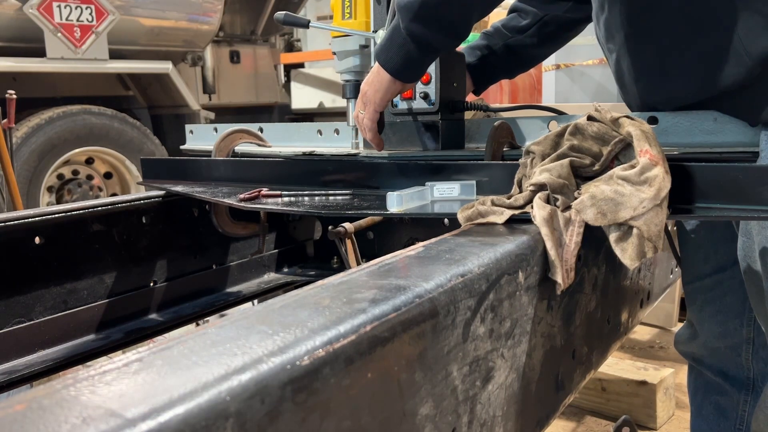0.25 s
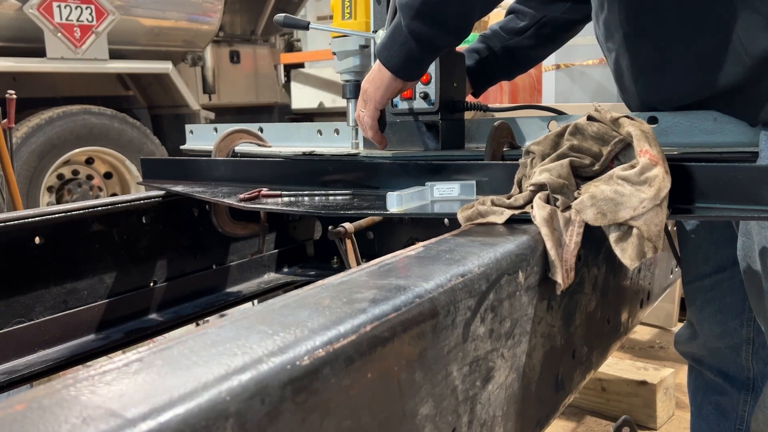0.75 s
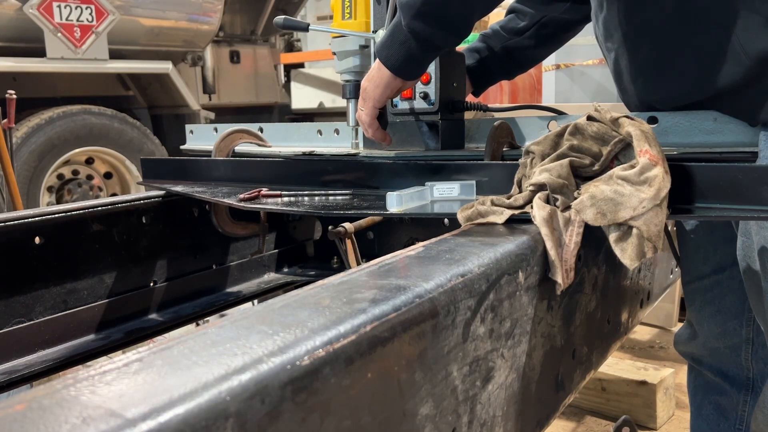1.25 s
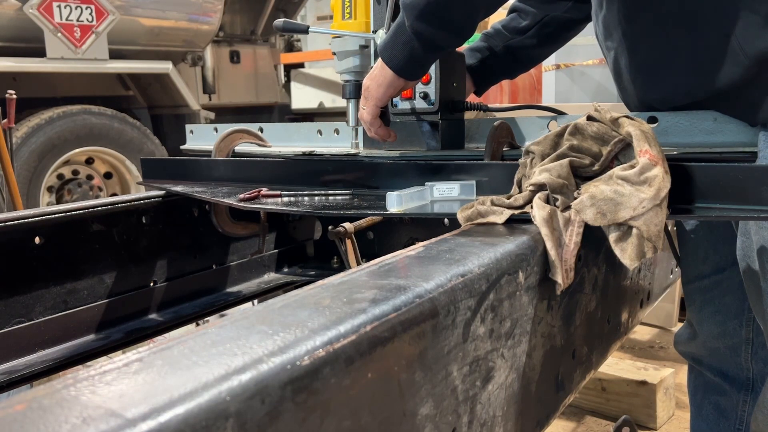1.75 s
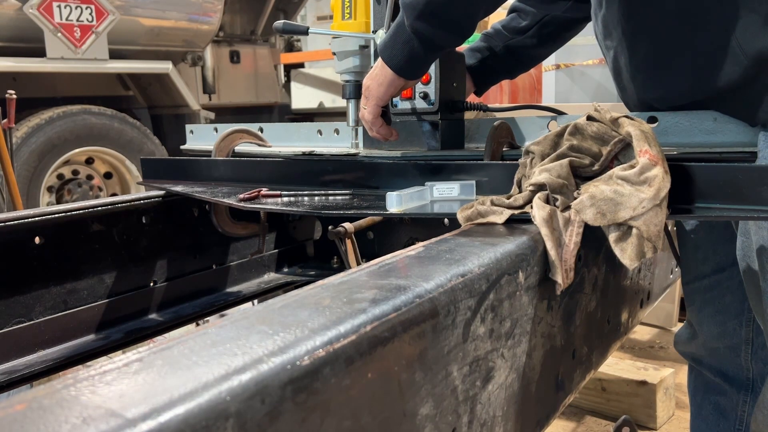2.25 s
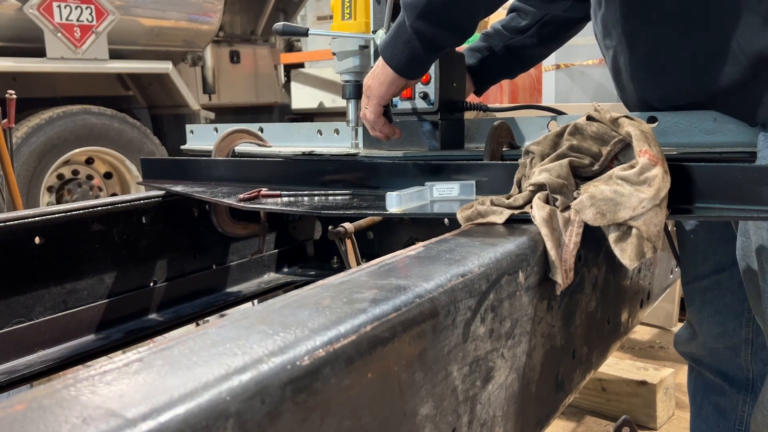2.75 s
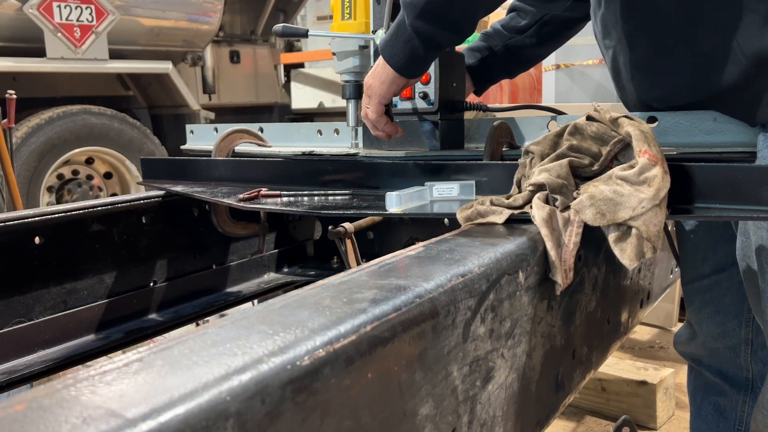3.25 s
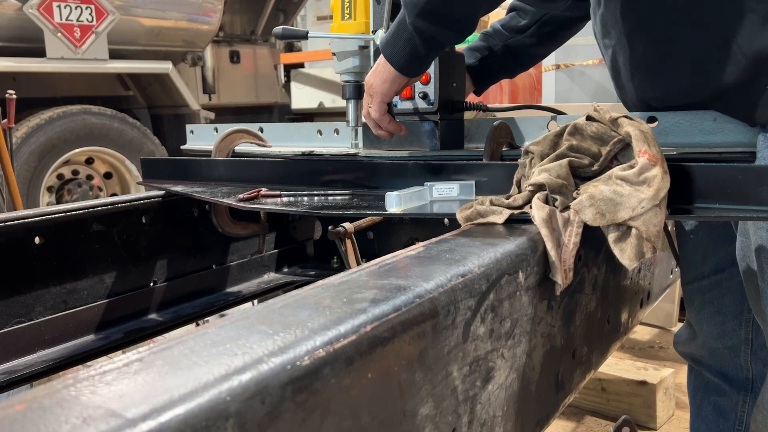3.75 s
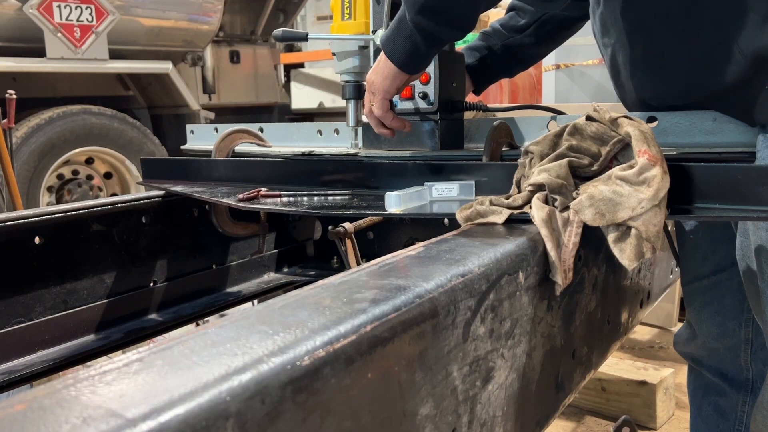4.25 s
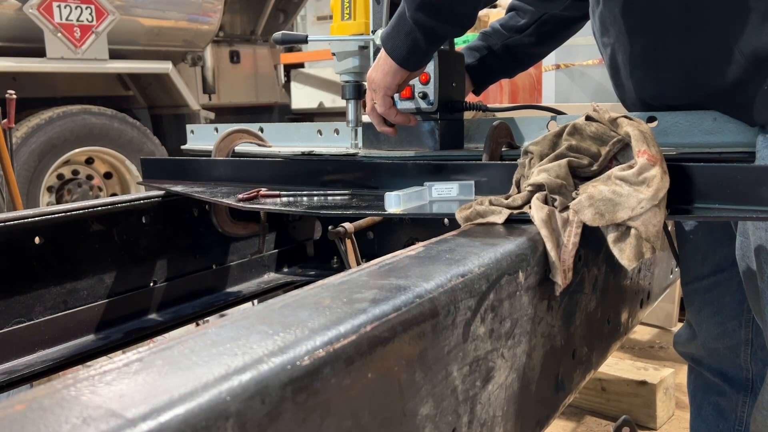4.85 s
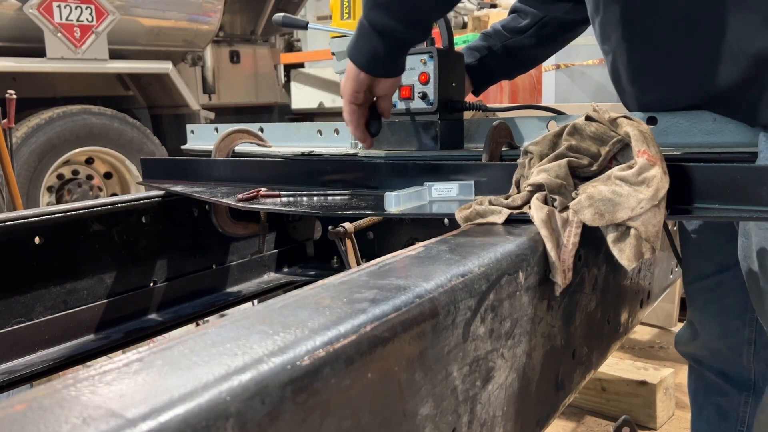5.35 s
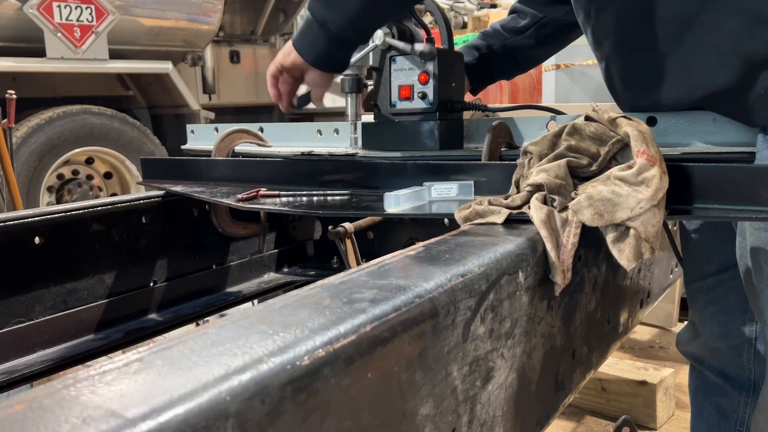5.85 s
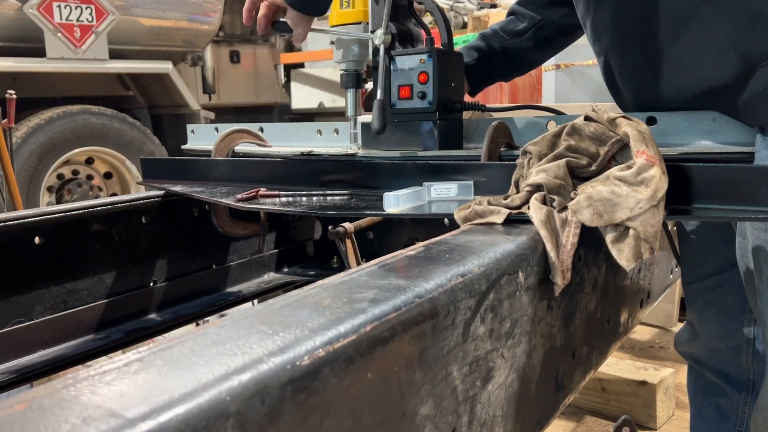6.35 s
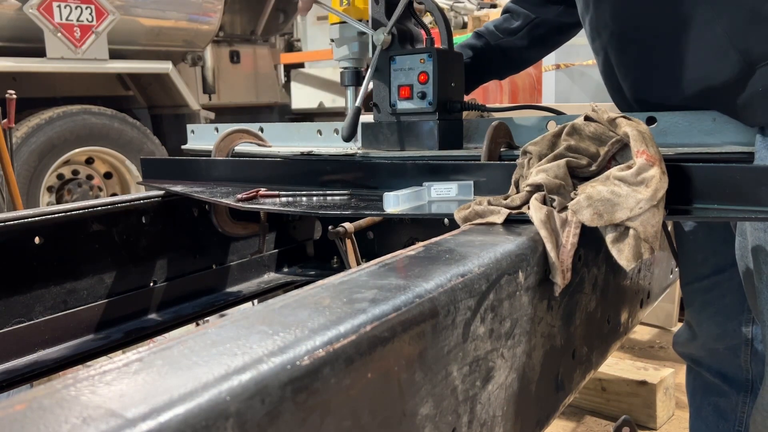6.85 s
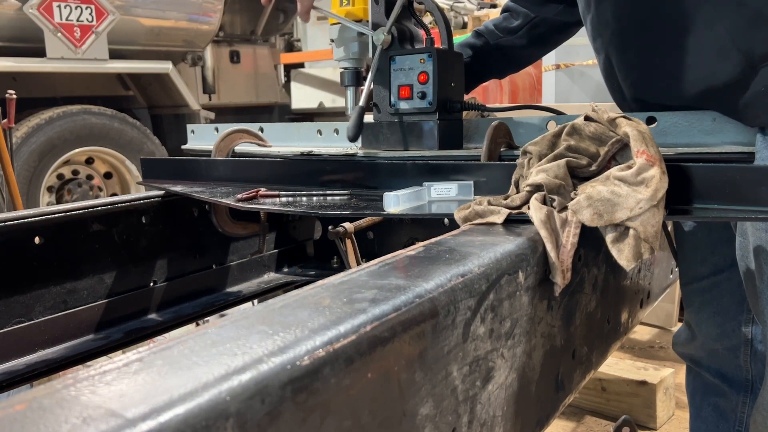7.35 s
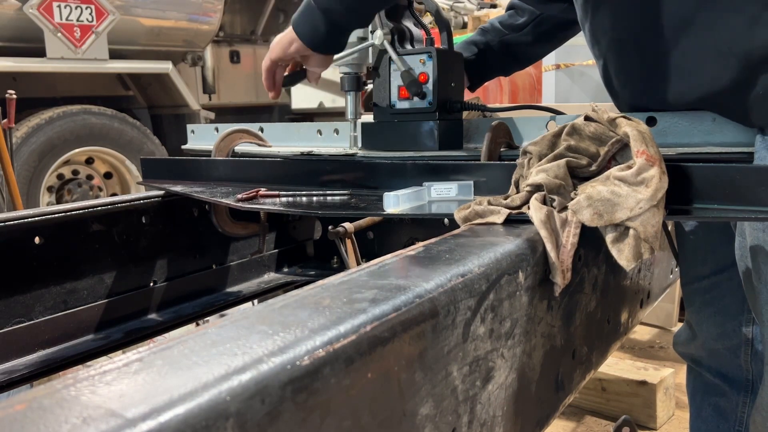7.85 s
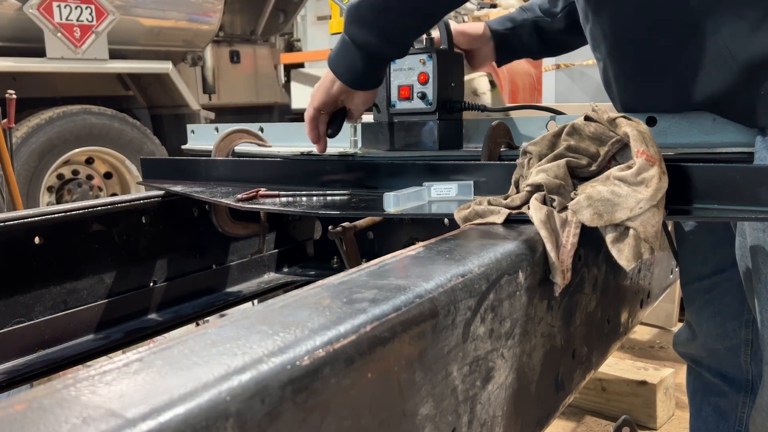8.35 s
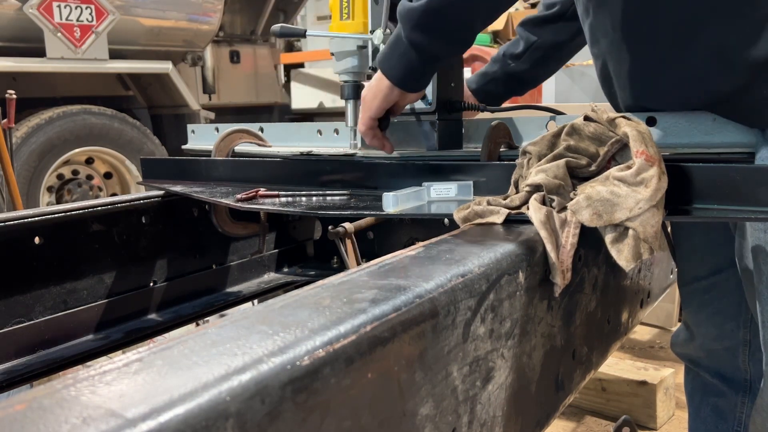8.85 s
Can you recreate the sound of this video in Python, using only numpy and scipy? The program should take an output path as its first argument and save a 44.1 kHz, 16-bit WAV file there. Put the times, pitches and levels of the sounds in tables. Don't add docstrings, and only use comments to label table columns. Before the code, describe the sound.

Continuous motor noise, near and bright: buzzing, rough gear teeth, brush hiss, faint low thudding in the hollow steel and slight mains hum. The pitch slides down unevenly under the cut, then sweeps up within about a second as the load vanishes. It runs free, smoother and breezier, the tone swelling and fading, with a slight drag at the end. Hard workshop reflections surround it.

```python
import sys
import numpy as np
from scipy import signal
from scipy.fft import rfft, irfft, next_fast_len
from scipy.io import wavfile
from scipy.ndimage import uniform_filter1d

SR = 44100
rng = np.random.default_rng(int(sys.argv[2]) if len(sys.argv) > 2 else 0)


def makeup_ratio(level_db):
    decades = np.asarray(level_db, float) / 20
    return 10 ** decades


def master_out(mix):
    frames = np.transpose(np.atleast_2d(mix))
    ceiling = np.clip(frames, -1, 1)
    pcm = np.round(ceiling * 32767).astype(np.int16)
    wavfile.write(sys.argv[1], SR, pcm)


N = 402191
PINION, WHEEL, COUNTER = 6, 35, 15


def curve(table):
    s, *columns = np.transpose(table)
    return [np.interp(np.arange(N) / SR, s, c) for c in columns]


def at_hz(points, hz):
    point_hz, value = np.transpose(points)
    return np.interp(np.log(hz), np.log(point_hz), value)


def over_hz(points, size):
    return at_hz(points, np.maximum(np.fft.rfftfreq(size, 1 / SR), 1))


def rings(table, hz):
    return sum(db / (1 + (2 * (hz - f) / width) ** 2) for f, width, db in table)


def walk(rate):
    k = int(SR / rate)
    held = np.repeat(rng.standard_normal(N // k + 1), k)
    x = uniform_filter1d(uniform_filter1d(held, k), k)[:N]
    return x / x.std()


def coloured(points, lo_hz, hi_hz, repeats=0):
    size = next_fast_len(N)
    gain = makeup_ratio(over_hz(points, size))
    hz = np.fft.rfftfreq(size, 1 / SR)
    inside = np.sum(gain[(hz > lo_hz) & (hz < hi_hz)] ** 2) / len(hz)
    spectrum = rfft(rng.standard_normal(N) + repeats, size) * gain
    return irfft(spectrum, size)[:N] / np.sqrt(inside)


def tone(turns, db):
    return np.sqrt(2) * makeup_ratio(db) * np.sin(2 * np.pi * turns)


# t/s, tooth rate f/Hz, bite level/dB
MESH = [(0.0, 1905, 1.5), (0.3, 1873, -2.5), (0.55, 1834, -2), (1.1, 1757, -1), (1.35, 1699, 2),
        (1.7, 1614, -1.5), (1.98, 1600, 1.5), (2.44, 1612, -2.5), (2.57, 1525, 1), (3.05, 1627, -2),
        (3.4, 1656, 1), (3.62, 1636, -1.5), (3.88, 1599, -1), (4.12, 1601, 0), (4.65, 1550, -0.5),
        (4.9, 1526, 0.5), (5.1, 1507, 1), (5.2, 1535, -0.5)]


def speed():
    through_s, free_hz, climb_s = 5.2, 2466, 0.46
    touch_s, drag_hz = 8.76, 20
    t = np.arange(N) / SR
    climb = 1 - np.exp(-np.maximum(t - through_s, 0) / climb_s)
    cut = curve(MESH)[0]
    drag = drag_hz * np.clip((t - touch_s) / 0.15, 0, 1)
    return cut + (free_hz - cut) * climb - drag


# t/s, load [0-1]
LOAD = [
    (0, 1),
    (1.5, 0.99),
    (5.18, 0.94),
    (5.25, 0.66),
    (5.45, 0.29),
    (5.9, 0.01),
    (8.7, 0.06),
    (9.12, 0.35),
]


def cutter_load():
    return np.clip(curve(LOAD)[0], 0, 1)


WHINE_DB = [-27, -31.5, -39.5, -38.5, -37.5, -42, -45, -43, -43.5]
SLACK_DB = [-16, -12.5, -21, -16, -26, -26, -45, -45, -45]
# f/Hz, width/Hz, level/dB
CASE_RINGS = [(1554, 120, 4.5), (1600, 17, 1), (1737, 17, -6.5), (2030, 210, 0.5), (2220, 240, -7),
              (3110, 180, 4), (3730, 230, 1), (4890, 240, 5), (5610, 455, 18), (7294, 360, 12.5),
              (8960, 160, -22), (9050, 400, 11)]
# t/s, length/s, tone level/dB, second multiple level/dB
KNIT = [(5.297, .1, -16, -8), (5.503, 0.26, 4.5, 1.5), (5.76, 0.11, -4, 4), (6.0, .25, 0, 6),
        (6.402, 0.26, 5, -5), (6.85, 0.26, -4, 2.5), (7.05, 0.19, 12.5, 3.5), (7.244, .25, -2, 5.5),
        (7.7, 0.44, 2, 2.5), (8.143, 0.38, 13, 6), (8.619, 0.39, -12, -7), (9.029, .25, 10, -2)]


def whine_levels(tooth_hz, load):
    t = np.arange(N) / SR
    knit = 0
    for s, length, *db in KNIT:
        swell = np.cos(np.pi * np.clip((t - s) / length / 1.6, -0.5, 0.5)) ** 2
        knit = knit + np.outer(db, swell)
    grid = np.arange(0, SR, 5.0)
    case = rings(CASE_RINGS, grid)
    bite = curve(MESH)[1] * load
    levels = []
    for k, (db, slack) in enumerate(zip(WHINE_DB, SLACK_DB)):
        level = db + bite + slack * (1 - load) + np.interp((k + 1) * tooth_hz, grid, case)
        if k < 2:
            level = level + knit[k] + 2.5 * (1 - load) * walk(22)
        else:
            level = level + 0.97 * walk(3.95)
        levels.append(level)
    return levels


RUNOUT_TURNS = [-3, -2, -1, 1, 2, 3]
# level/dB, phase/rad
RUNOUT = [(-22, .3), (-14, 1.3), (-15, -.5), (-7.5, .7), (-20, 2.6), (-24, 1.6)]
ROUGH = [(0.18, 0.23), (0.3, 0.6), (0.27, 0.32), (0.34, 0.29), (0.4, 0.41), (.5, .3), (0.45, .3),
         (0.54, .3), (.5, .3)]


def gear_whine(teeth, tooth_hz, load):
    sides = [np.exp(2j * np.pi * n * teeth / WHEEL) * (1 + 0.26 * walk(4.97)) for n in RUNOUT_TURNS]
    twist = load * (0.18 * walk(25) + 0.18 * walk(130))
    blow = np.exp(1j * (2 * np.pi * teeth + twist))
    out, carrier = 0, 1
    for k, db in enumerate(whine_levels(tooth_hz, load)):
        carrier = carrier * blow
        runout = sum(makeup_ratio(d) * np.exp(1j * (k + 1) * rad) * side for side, (d, rad) in zip(sides, RUNOUT))
        slow, wide = ROUGH[k]
        scatter = slow * (walk(55) + 1j * walk(55)) + wide * (walk(520) + 1j * walk(520))
        swing = 1 + load * (runout + scatter) + 0.11 * walk(9)
        swing = swing / np.sqrt(uniform_filter1d(abs(swing) ** 2, SR // 4))
        out = out + np.sqrt(2) * makeup_ratio(db) * np.real(swing * carrier)
    return out


# f/Hz, level/dB
SECOND_MESH = [(650, -43.5), (685, -45), (705, -41), (770, -38.5), (830, -40), (935, -52), (968, -33),
               (1030, -48.5)]


def wheel_shaft(teeth, tooth_hz, load):
    turns = teeth / WHEEL
    faint = sum(tone(n * turns, db + 2 * walk(3.1)) for n, db in [(24, -51), (28, -50)])
    mesh_db = at_hz(SECOND_MESH, COUNTER * tooth_hz / WHEEL) + 0.74 * walk(25)
    return load * faint + tone(COUNTER * turns, mesh_db)


# turns f/Hz, level/dB
UNBALANCE = [(250, -49.5), (268, -52), (285, -45.5), (315, -41.5), (360, -45.5), (392, -39), (403, -40),
             (410, -37)]


def armature(teeth, tooth_hz, load):
    turns = teeth / PINION
    slots = zip([2, 5, 7, 8, 14, 26], [-53, -50, -49, -52, -54, -56])
    faint = sum(tone(n * turns, db + 3.3 * walk(4.4)) for n, db in slots)
    unbalance_db = at_hz(UNBALANCE, tooth_hz / PINION) + 1.56 * walk(16)
    return tone(turns, unbalance_db) + (0.48 + 0.6 * load) * faint


def clatter(teeth):
    place = (teeth / WHEEL % 1 * 1024).astype(int)
    return sum(walk(3) * rng.standard_normal(1024)[place] for _ in range(6)) / np.sqrt(6)


# f/Hz, level/dB per Hz
RUMBLE = [(30, -58), (45, -40), (60, -16.5), (150, -21), (250, -8), (500, -5), (900, 0.5), (1400, -2),
          (2200, -5.5), (4000, -14), (8000, -36)]


def rumble(teeth, tooth_hz, load, shake):
    speed_db = 20 * np.log10(tooth_hz / 1600)
    level_db = -34.5 + 2.31 * speed_db + 8 * (load - 1) + 0.5 * walk(18)
    throb = np.sin(2 * np.pi * teeth / WHEEL)
    swing_db = load * (0.36 * throb + 1.2 * shake)
    return coloured(RUMBLE, 410, 1283, 0.29 * clatter(teeth)) * makeup_ratio(level_db + swing_db)


# f/Hz, level/dB per Hz
HISS = [(700, -17.5), (1800, -2.5), (3000, 3.5), (4200, -6), (6000, 4.5), (8000, 1.5), (10000, -1),
        (12000, 0.5), (14000, -1.5), (15800, -6.5), (16500, -35)]


def hiss(teeth, tooth_hz, load, shake):
    speed_db = 20 * np.log10(tooth_hz / 1600)
    level_db = -42 + 3.2 * speed_db + 13 * (load - 1) + 0.41 * walk(60)
    throb = np.sin(2 * np.pi * teeth / WHEEL)
    swing_db = load * (3 * throb + 1.5 * shake)
    return coloured(HISS, 11430, 12650) * makeup_ratio(level_db + swing_db)


# f/Hz, level/dB per Hz
FAN = [(800, -15), (1500, -6), (2600, -1.5), (4300, 4.5), (5800, 1.5), (7500, -5), (10000, -42)]


def fan(tooth_hz):
    return coloured(FAN, 1500, 6100) * makeup_ratio(-31 + 0.5 * walk(6.9)) * (tooth_hz / 2450) ** 2.23


# f/Hz, level/dB per Hz
THUD = [(50, -12), (100, -10), (170, -1), (230, 4.5), (350, -44), (600, -36)]


def rail_thud(load):
    return coloured(THUD, 100, 233) * load * makeup_ratio(-51.5 + 1.7 * walk(4.12))


def mains():
    t = np.arange(N) / SR
    beat = np.sin(2 * np.pi * 0.496 * (t - 1.2))
    return tone(60 * t, -66 + 4.8 * np.tanh(2.5 * beat))


# f/Hz, width/Hz, level/dB
BODY_RINGS = [(581, 74, 4.5), (837, 39, 2), (1270, 46, 3), (1844, 190, 4), (2100, 24, 1), (3105, 17, 5),
              (3490, 88, 2), (8210, 110, 6), (9150, 73, 0.5)]
# f/Hz, level/dB
WET = [(60, -21), (250, -13), (500, -6), (1000, -7), (2000, -5), (4000, -1), (6500, -1), (8000, -4),
       (10000, -12), (14000, -17)]
PORT_MIX = [(.3, .95), (.3, -.95)]
# f/Hz, level/dB
TILT = [(100, 1.5), (350, 2.5), (700, 0.7), (2300, 0.8), (3500, 1.5), (5200, 6.5), (7200, 5), (9300, -2),
        (10500, 1.5)]
# f/Hz, phase/rad
LEAD = [(60, 0), (1700, 0), (3100, 1.2), (4500, 1), (5500, 1.9), (7200, 2.1), (8600, -.3), (10300, -3.14),
        (12200, -6.28), (13850, -9.42), (15500, -12.57), (17000, -14)]


def at_ports(drill):
    t60_s = 0.7
    size = next_fast_len(N + SR)
    body = makeup_ratio(rings(BODY_RINGS, np.fft.rfftfreq(size, 1 / SR)))
    decay = np.exp(-np.log(1000) * np.arange(SR) / SR / t60_s)
    tails = rng.standard_normal((2, SR)) * decay
    wet = makeup_ratio(over_hz(WET, size))
    walls = wet * rfft(PORT_MIX @ tails / np.sqrt(np.sum(tails[0] ** 2)), size)
    port = makeup_ratio(over_hz(TILT, size) / 2) * np.exp(0.5j * over_hz(LEAD, size))
    paths = np.array([port, 1 / port]) * (1 + walls) / np.sqrt(1 + wet ** 2)
    return irfft(paths * body * rfft(drill, size), size)[:, :N]


def scene():
    tooth_hz, load = speed(), cutter_load()
    teeth = np.cumsum(tooth_hz) / SR
    shake = 0.6 * walk(20)
    drill = gear_whine(teeth, tooth_hz, load) + wheel_shaft(teeth, tooth_hz, load)
    drill = drill + armature(teeth, tooth_hz, load)
    drill = drill + rumble(teeth, tooth_hz, load, shake) + hiss(teeth, tooth_hz, load, shake)
    drill = drill + fan(tooth_hz) + rail_thud(load)
    return at_ports(drill + mains())


def band_limit(x):
    return signal.sosfilt(signal.butter(12, 16970, fs=SR, output="sos"), x)


def record(dry):
    top = signal.ellip(8, 0.2, 60, 15800, fs=SR, output="sos")
    bottom = signal.butter(3, 48, "high", fs=SR, output="sos")
    mix = signal.sosfilt(np.vstack([top, bottom]), dry)
    return band_limit(mix)


dry = scene()
out = record(dry)
master_out(out)
```